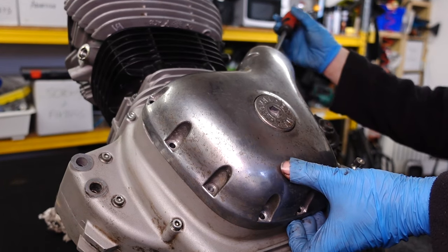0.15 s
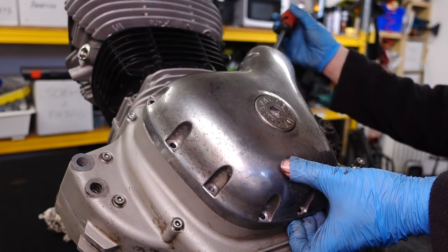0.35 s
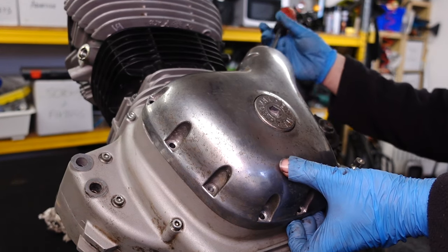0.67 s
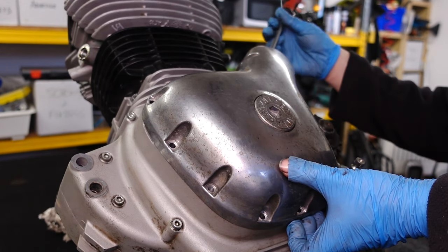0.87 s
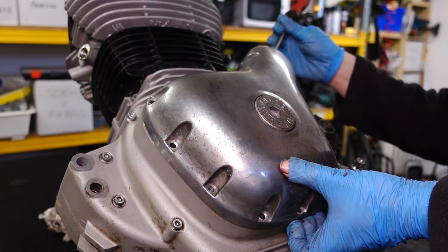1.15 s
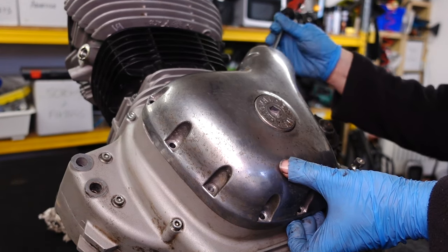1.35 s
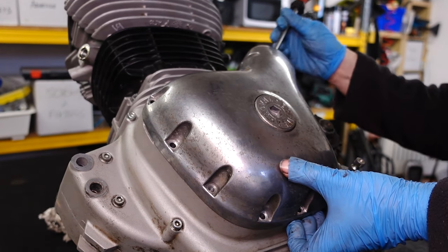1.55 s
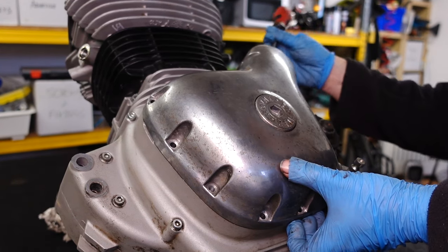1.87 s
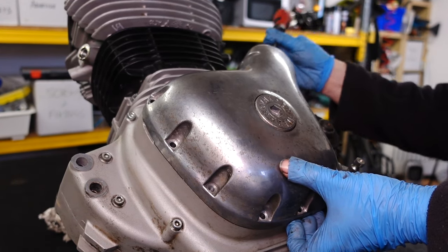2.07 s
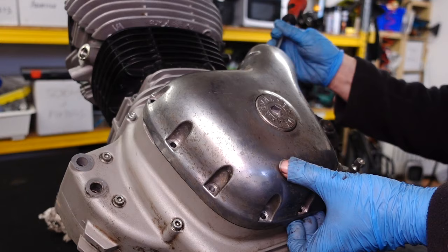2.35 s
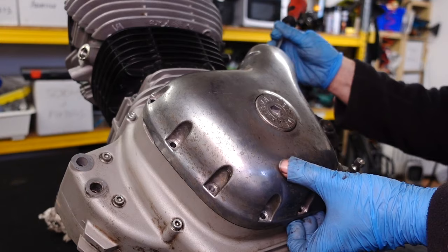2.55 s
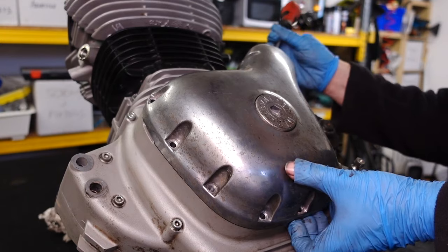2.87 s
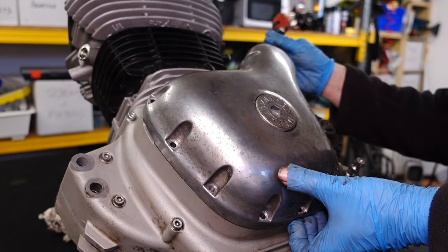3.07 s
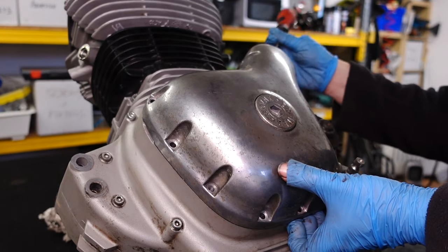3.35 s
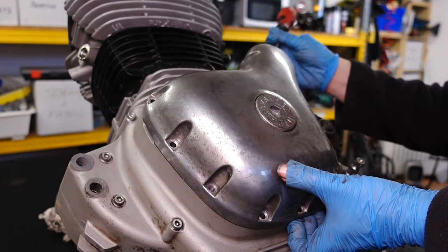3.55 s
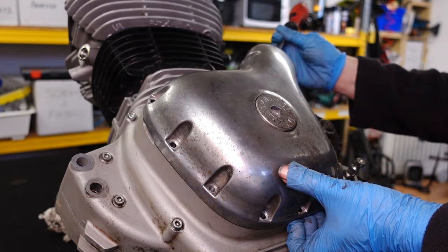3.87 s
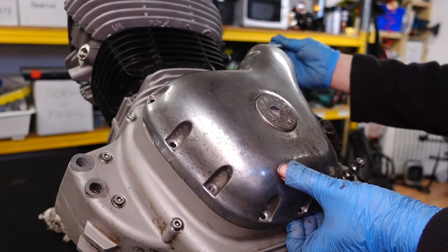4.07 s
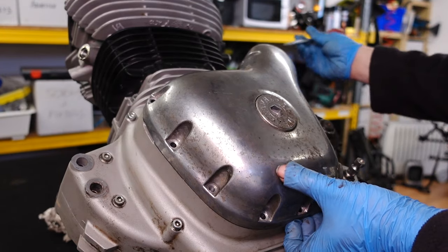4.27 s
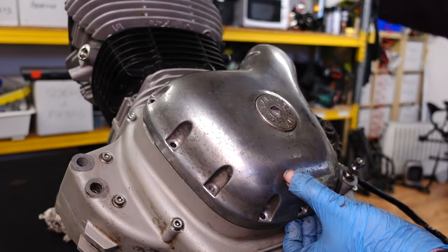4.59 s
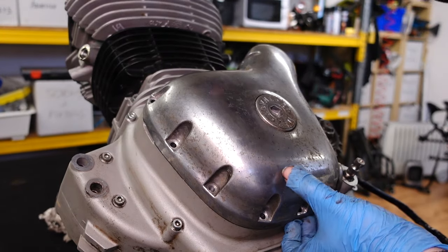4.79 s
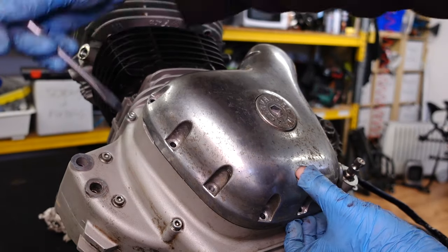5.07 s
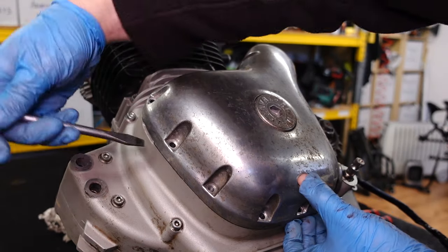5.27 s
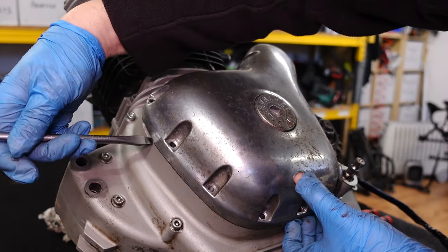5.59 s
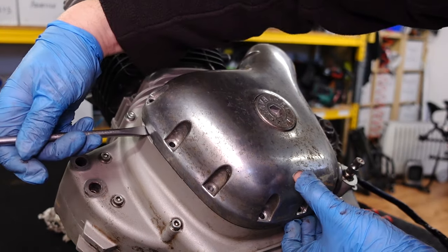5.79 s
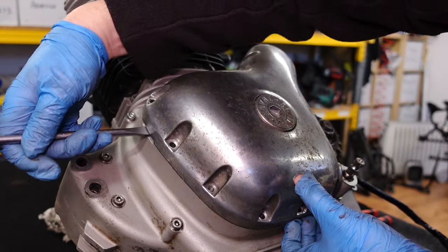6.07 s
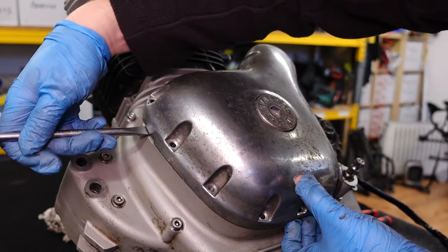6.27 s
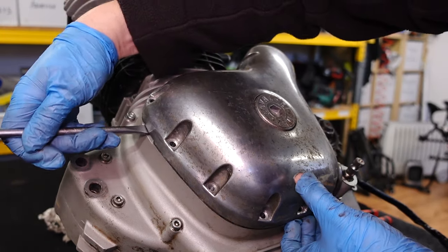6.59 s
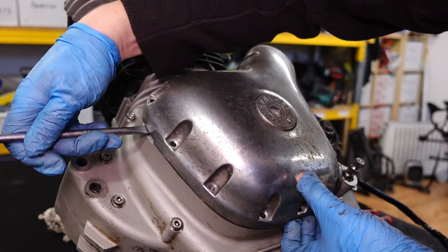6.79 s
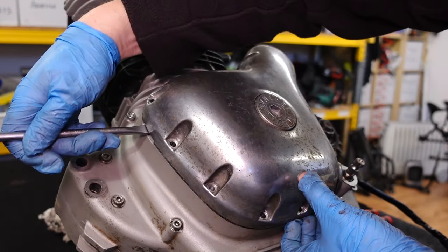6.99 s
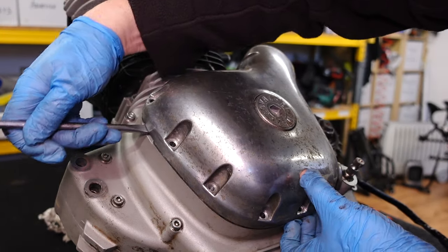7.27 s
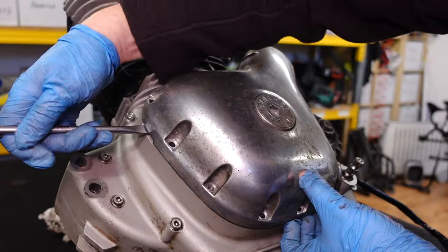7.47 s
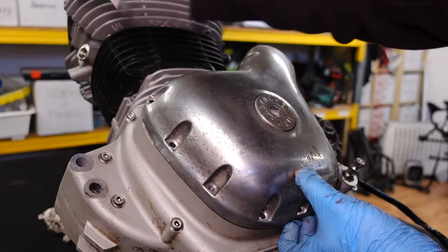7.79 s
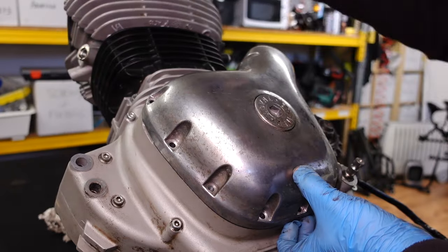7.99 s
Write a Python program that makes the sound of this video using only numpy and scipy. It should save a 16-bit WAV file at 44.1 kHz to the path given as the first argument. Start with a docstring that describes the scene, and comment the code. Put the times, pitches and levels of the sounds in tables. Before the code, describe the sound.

Light steel ticks and rubbery handling, a run of hollow metallic prying knocks, a pause, one hard click, then a sharp crack and loose dull knocks.

```python
"""On a workshop bench, a flat screwdriver taps and then pries at an engine's cast aluminium side cover.
Steel clicks are cracks of noise through blade resonances; the cover's knocks are damped modes; handle
bumps, then the rocking engine, thud as soft low pushes. Rubber, cloth and scrapes are noise in swells.
A rest with scattered clicks follows; then the seal cracks, the cover jumps, clatters and jolts the bench,
and is levered loose and settles. Small-room reflections follow each blow; quiet air lies underneath."""
import sys
import numpy as np
from scipy import signal
from scipy.fft import rfft, irfft, next_fast_len
from scipy.io import wavfile
from scipy.ndimage import map_coordinates

SR = 44100
rng = np.random.default_rng(int(sys.argv[2]) if len(sys.argv) > 2 else 0)


def unload_wav(signal):
    """Save mono or channel-first audio to the path in sys.argv[1] as 16-bit WAV at rate SR, clipped to [-1, 1]."""
    wavfile.write(
        sys.argv[1],
        SR,
        np.round(np.clip(np.atleast_2d(signal).T, -1, 1) * 32767).astype(np.int16),
    )


N = 358533
AGE = np.arange(SR // 2) / SR  # seconds since a contact
FIRST_10_MS, FIRST_20_MS, FIRST_31_MS = SR // 100, SR // 50, SR // 32  # stretches that set a level, samples

# Lever strokes in the joint: start_s, body_db, clank_db, clack_db, tick_db, blade_hz, return_scrape_db
PRY_STROKES = [(1.5098,-35,-43.5,-42.5,-55.5,1620,-65), (1.734,-40.5,-49,-53.5,-42,6100,-59),
               (1.9935,-39,-50,-59.5,-46.5,6100,-56), (2.192,-28.5,-42.5,-49,-43,6570,-60),
               (2.382,-28.5,-42.5,-49.5,-42,4630,-64.5), (2.578,-27.5,-45.5,-46.5,-47,4600,-62),
               (3.29,-26.5,-49.5,-44.5,-36,6130,-70), (3.511,-23,-53,-51.5,-48.5,4600,-96)]
# As the seal gives, the cover sounds higher and the bench gets less force: time_s, pitch_hz, thud_db
SEAL_GIVING = [(1.51,383,-41), (2.19,510,-38.5), (2.58,565,-41.5), (3.29,570,-53), (3.51,570,-55)]
FREE_HZ, RING_GROWTH = 558, 1.05  # pitch (Hz) of full ring time; power by which ring time follows pitch
# After a pry the tip drags back: share of the gap to the next stroke, longest delay (s), spread (s)
RETURN_SHARE, RETURN_MAX_S, RETURN_SPREAD_S = .45, 0.197, .013

# The seal cracks, then the cover jumps: start_s, body_db, clank_db, clack_db, tick_db, fizz_db, thud_db
SEAL_CRACKS = [(6.393,-35,-51.5,-50.5,-56.5,-65.5,-37.5), (6.4137,-14.5,-31,-38.5,-41,-43.5,-31.5)]
LOOSE_S = 6.416  # the cover jumps loose
BOUNCE_S, BOUNCE_LOSS_DB, FIRST_BOUNCE_DB = .018, 5.5, -36.5  # spacing, loss per bounce, first clank
# Bench modes under the jolt, before its taper: pitch_hz, level_db, t60_s
BENCH_MODES = [(31,-51,3), (47,-54.5,0.6), (177,-56,0.28), (192,-45,0.56), (215.4,-36,0.57), (264,-46,0.34)]

# The loose cover is levered out and falls back: start_s, body_db, fall_db
LOOSE_STROKES = [(6.709,-33,-53.5), (6.923,-32.5,-40), (7.1281,-27.5,-40.5), (7.3371,-27.5,-41)]
SLACK_S, FALL_S = .0095, .052  # slack is taken up this long before the knock; the fall comes after it

# The tip clicks on the metal as it lands, or at 4.06 s as it pulls out:
# start_s, body_db, clack_db, tick_db, blade_hz
TIP_CLICKS = [(0.1191,-59.5,-47,-41.5,4840), (0.266,-63,-57.5,-66,2970), (0.404,-51.5,-52.5,-54,2960),
              (0.4187,-48.5,-47,-49,1730), (0.869,-68,-58,-67,2250), (0.937,-47,-60,-63,4500),
              (1,-52.5,-52.5,-47,4230), (1.184,-59,-53.5,-53.5,5700), (2.798,-56,-58,-55,5750),
              (3.2863,-62,-54,-41,4700), (3.536,-70,-63,-54,4600), (4.06,-53,-40,-32.5,5070),
              (5.431,-19.5,-28.5,-29.5,3780), (5.831,-47,-58.5,-78,3800), (5.88,-62.5,-70,-62,5230),
              (5.974,-48.5,-68,-59,3550)]
CLICK_SPOT_HZ = 548
RING_DOUBLING_DB, FULL_RING_DB = 28.5, -20.5  # a harder contact rings longer, fully at this body level
PULL_OUT_S = 4.0605
# The blade rings on, clear of the joint: pitch_hz, level_db, t60_s
FREE_BLADE_MODES = [(1426,-44,0.12), (2140,-49,0.18), (2270,-56,.2), (5210,-61,.22), (5230,-57,0.33),
                    (7230,-48,0.12), (7200,-49,0.11)]

# The cover settles softly on its case: start_s, body_db, pitch_hz
COVER_SETTLES = [(1.223,-48.5,672), (1.603,-46,466), (1.8415,-45,540), (2.119,-52,580), (2.296,-50.5,560),
                 (3.429,-51.5,543), (3.708,-50,551), (6.538,-43,532), (7.565,-46,460)]
# Soft thuds: the handle bumps in the first second, later the engine rocks on the bench:
# start_s, level_db, pitch_hz
SOFT_THUDS = [(0.416,-53,213), (0.599,-57.5,326), (0.935,-57,217), (1.219,-46.5,132), (1.283,-55,103),
              (1.366,-51,101), (1.452,-54.5,121), (1.511,-35.5,161.4), (1.571,-34,114), (1.657,-42,144),
              (1.82,-40.5,112), (7.566,-51.5,129)]

# Bending modes of the whole cover, at ring length 1: pitch_hz, relative_db, t60_s
COVER_MODES = [(370,3,0.12), (473.1,3,0.14), (513,-8,0.14), (583.5,2.5,0.049), (594.8,-3.5,0.14),
               (685,-8,0.076), (755,-6,0.15)]
# Higher modes of the cover's wall, at ring length 1: pitch_hz, relative_db, t60_s
WALL_MODES = [(877,5.5,0.05), (977,-6.5,0.13), (1043,-3,0.075), (1259,2,0.052), (1334,3,0.079),
              (1470,-13,.14), (1500,-11,0.076), (1700,-11.5,0.023)]
# Modes of the steel blade: pitch_hz, relative_db, t60_s
BLADE_MODES = [(2280,-15.5,0.04), (3094,-3,0.057), (4340,9,0.021), (4880,3,0.042), (5660,-17.5,.05),
               (7130,-4,0.029), (8370,-13,0.037)]

# The tip drags along the joint: centre_s, spread_s, grit_db, body_db
TIP_SCRAPES = [(0.408,0.0072,-55,-55), (1.205,0.0098,-64,-55), (1.66,0.01,-57.5,-40.5),
               (2.735,0.055,-61,-54.5), (2.916,0.014,-65.5,-61.5), (3.108,0.088,-69,-66),
               (4.019,0.017,-57.5,-51.5), (4.35,0.054,-72,-62), (4.83,0.03,-66,-60.5),
               (5.977,0.012,-66,-43), (6.192,0.01,-78,-55), (6.415,0.0072,-41,-46.5),
               (7.54,0.013,-56,-49.5)]
# The rubber glove slides on the handle: centre_s, spread_s, level_db
GLOVE_SLIDES = [(.535,0.025,-53.5), (.605,0.024,-50), (.74,0.1,-62.5), (.96,0.038,-56), (4.53,0.018,-59.5),
                (6.31,0.024,-66.5)]
# The sleeve moves with the arm: centre_s, spread_s, level_db
SLEEVE_MOVES = [(3.88,0.16,-67.5), (4.2,0.12,-64.5), (4.75,0.18,-67), (5.3,0.53,-69), (8.08,0.17,-66)]

# Colour of gritty steel sliding: frequency_hz, relative_db
GRIT_COLOUR = [(1200,-35), (2000,-8), (2800,-5), (3500,-7), (4500,-1), (5400,-5), (6150,0.5), (6900,-9.5),
               (14000,-27.5)]
# Colour of rubber rubbing: frequency_hz, relative_db
RUBBER_COLOUR = [(1000,-29.5), (2000,-6.5), (2800,2.5), (4000,-1), (6000,3.5), (9700,-1), (16000,-15)]
# Colour of cloth rubbing: frequency_hz, relative_db
CLOTH_COLOUR = [(400,-27), (900,0.5), (1800,-0.5), (3600,-1), (6500,-4), (10000,-11), (16000,-22.5)]

# Decay of the small room: frequency_hz, t60_s
ROOM_DECAY = [(100, 0.32), (500, 0.27), (1300, 0.37), (5000, 0.28), (14000, 0.06)]
# Colour of the room's reflections: frequency_hz, relative_db
REFLECTION_COLOUR = [(80,6), (200,8.5), (500,-1.5), (750,-3), (1100,-8.5), (1800,-9), (3500,-8.5),
                     (6000,-11), (14000,-0.5)]
# Colour of the workshop's air: frequency_hz, relative_db
AIR_COLOUR = [(12,-19.5), (22,3.5), (60,-4.5), (107,3.5), (146,-6.5), (190,-4.5), (350,-8), (590,-12),
              (1000,-19.5), (2200,-24), (6000,-22), (15000,-30)]
AIR_DB = -62.5
TOP_HZ = 16000  # top of the camera's band


def pries(fizz_db=-18, overtone_db=-7, lead_s=0.00712, lead_db=-16, lead_clank_db=-16):
    """Each lever stroke takes up slack, snaps the tip, knocks the cover and shoves the engine on the bench."""
    out = np.zeros(N)
    seal_s, seal_hz, seal_db = np.transpose(SEAL_GIVING)
    for s, body_db, clank_db, clack_db, tick_db, blade_hz, _ in PRY_STROKES:
        spot_hz = np.interp(s, seal_s, seal_hz)
        thud_db = np.interp(s, seal_s, seal_db)
        slack = knock(body_db + lead_db, clank_db + lead_clank_db, spot_hz=643, length=1.0, hard_rise_s=0.008)
        add(out, s - lead_s, slack)
        add(out, s, knock(body_db, clank_db, spot_hz, length=(spot_hz / FREE_HZ) ** RING_GROWTH))
        add(out, s, click(clack_db, tick_db, tick_db + fizz_db, blade_hz, blade_db=9.5))
        add(out, s, thud(thud_db, hz=116.4) + thud(thud_db + overtone_db, hz=204))
    return out


def breakaway(overtone_db=-2):
    """The seal lets go in two quick cracks that shake the engine."""
    out = np.zeros(N)
    for s, body_db, clank_db, clack_db, tick_db, fizz_db, thud_db in SEAL_CRACKS:
        add(out, s, knock(body_db, clank_db, spot_hz=506, length=0.63))
        add(out, s, click(clack_db, tick_db, fizz_db, blade_hz=2700, blade_db=9.5))
        add(out, s, thud(thud_db, hz=131) + thud(thud_db + overtone_db, hz=215))
    return out


def clatter(body_db=-4, count=4):
    """After the jump the cover bounces on its rim, each time more weakly."""
    out = np.zeros(N)
    for k in range(count):
        clank_db = FIRST_BOUNCE_DB - k * BOUNCE_LOSS_DB
        bounce = knock(clank_db + body_db, clank_db, spot_hz=710, length=1.6, hard_rise_s=.012)
        add(out, LOOSE_S + (k + .5) * BOUNCE_S, bounce)
    return out


def jolt():
    """When the cover jumps loose, the whole bench shudders in its damped modes."""
    out = np.zeros(N)
    taper = (1 - AGE / AGE[-1]) ** .5  # silent after half a second
    add(out, LOOSE_S, ring(BENCH_MODES, 1, scatter_db=3.0) * swell(.008) * taper)
    return out


def wiggles(lead_db=-9, lead_clank_db=-26, ring_db=-7, fall_clank_db=-24):
    """The loose cover takes up its slack, knocks against the blade and drops back."""
    out = np.zeros(N)
    for s, db, fall_db in LOOSE_STROKES:
        add(out, s - SLACK_S, knock(db + lead_db, db + lead_clank_db, spot_hz=513, length=0.83))
        add(out, s, nudge(db) + knock(db + ring_db, clank_db=-50, spot_hz=450.5, length=1.0))
        add(out, s, click(clack_db=-52.5, tick_db=-56, fizz_db=-70.5, blade_hz=1730, blade_db=-12))
        add(out, s, thud(db=-47, hz=135))
        add(out, s + FALL_S, knock(fall_db, fall_db + fall_clank_db, spot_hz=452, length=1.03))
    return out


def tip_clicks(clank_db=-7, fizz_db=-19):
    """The tip clicks on the metal and the cover answers; pulled clear, the blade rings freely."""
    out = np.zeros(N)
    for s, body_db, clack_db, tick_db, blade_hz in TIP_CLICKS:
        length = 2 ** ((body_db - FULL_RING_DB) / RING_DOUBLING_DB)
        add(out, s, knock(body_db, (body_db + clack_db) / 2 + clank_db, CLICK_SPOT_HZ, length))
        add(out, s, click(clack_db, tick_db, tick_db + fizz_db, blade_hz, blade_db=17))
    add(out, PULL_OUT_S, ring(FREE_BLADE_MODES, 1, scatter_db=1.5))
    return out


def settling(clank_db=-14):
    """The cover sinks back on its case with soft knocks; the handle bumps, later the engine rocks: soft thuds."""
    out = np.zeros(N)
    for s, db, spot_hz in COVER_SETTLES:
        add(out, s, knock(db, db + clank_db, spot_hz, length=0.91))
    for s, db, hz in SOFT_THUDS:
        add(out, s, thud(db, hz))
    return out


def knock(db, clank_db, spot_hz, length, hard_rise_s=0.00084, octaves=0.16, rattle_db=-3, chatter_db=-7):
    """The cover's low modes ring as the spot and the hand allow; its wall adds a short clank."""
    favour = lambda hz: 1 / (1 + (np.log2(hz / spot_hz) / octaves) ** 2)
    rise = min(hard_rise_s * amp(db - clank_db - 13.5), .008)  # a blow with little clank is a slow push
    modes = ring(COVER_MODES, length, scatter_db=4.5, weight=favour) * swell(rise)
    body = unit(band(modes, spot_hz * 0.65, spot_hz * 1.187), FIRST_20_MS)
    rattle = unit(band(burst(0.028) * swell(rise), spot_hz * 0.61, 860), FIRST_20_MS)
    wall = unit(ring(WALL_MODES, length ** .5, scatter_db=5.0) * swell(rise / 2), FIRST_20_MS)
    chatter = unit(band(burst(0.021) * swell(rise / 2), 850, 1500), FIRST_20_MS)
    clank = unit(wall + amp(chatter_db) * chatter, FIRST_20_MS)
    low = in_room(amp(db) * body, wet_db=-21.0)
    return low + in_room(amp(clank_db) * (clank + amp(rattle_db) * rattle), wet_db=-8.5)


def click(clack_db, tick_db, fizz_db, blade_hz, blade_db, crack_t60=0.022, snap_db=8, ring_db=-11,
          sharpness=9, casting_db=-4, rim_hz=1750, rim_db=6):
    """Steel cracks on aluminium: noise coloured by a blade resonance and the cover's rim, plus a faint ring."""
    crack = unit(burst(crack_t60) + amp(snap_db) * burst(0.0018), FIRST_10_MS)
    resonance = lambda hz: signal.lfilter(*signal.iirpeak(hz, sharpness, fs=SR), crack)
    blade_ring = unit(ring(BLADE_MODES, 1, scatter_db=1.5), FIRST_10_MS)
    steel = crack + amp(blade_db) * resonance(blade_hz) + amp(ring_db) * blade_ring
    rim = amp(rim_db) * resonance(rim_hz)
    clack = amp(clack_db) * unit(band(steel + rim, 1200, 2960, order=4), FIRST_10_MS)
    tick = amp(tick_db) * unit(band(steel, 3100, 7600, order=4), FIRST_10_MS)
    fizz = amp(fizz_db) * unit(band(crack, 7800, 14000, order=2), FIRST_10_MS)
    # A dull tock stands for the part of the crack that passes into the casting.
    tock = amp(clack_db + casting_db) * unit(band(burst(0.027), 620, 1250, order=2), FIRST_10_MS)
    return in_room(tick + fizz, wet_db=-11.5) + in_room(clack + tock, wet_db=-7.5)


def thud(db, hz, push_s=0.0062):
    """A soft low push that swells and dies in a few cycles, with a brief boom as of bench boards."""
    u = AGE / push_s * hz / 120  # a low push also swells and dies more slowly
    push = unit(np.sin(2 * np.pi * hz * AGE) * u ** 2 * np.exp(-u), FIRST_31_MS)
    boards = amp(-10) * unit(band(burst(.18) * swell(.006), 75, 280), FIRST_31_MS)
    return in_room(amp(db) * unit(push + boards, FIRST_31_MS), wet_db=-17)


def nudge(db, hz=535, push_s=0.0019):
    """The blade bears on the cover and damps it at once: a knock of only a few cycles."""
    u = AGE / push_s
    envelope = (u * u * np.exp(-u / 2)) ** 2
    cycles = unit(np.sin(2 * np.pi * hz * AGE) * envelope, FIRST_20_MS)
    return in_room(amp(db) * cycles, wet_db=-21.5)


def scrapes(wall_db=-8):
    """The dragged tip hisses and sets the cover's wall and body singing."""
    strokes = list(TIP_SCRAPES) + return_strokes()
    grit, body = level(strokes, 2), level(strokes, 3)
    wall = amp(wall_db) * np.sqrt(grit * body)
    rasp = grainy(hiss(GRIT_COLOUR), rate=400, depth=3)
    return grit * rasp + wall * rubbed(WALL_MODES) + body * rubbed(COVER_MODES)


def return_strokes(body_db=7):
    """After each pry the tip drags back; rows as in TIP_SCRAPES."""
    gaps = np.diff([row[0] for row in PRY_STROKES], append=N / SR)
    rows = []
    for (s, *_, grit_db), gap in zip(PRY_STROKES, gaps):
        delay = min(RETURN_SHARE * gap, RETURN_MAX_S)
        rows.append((s + delay, RETURN_SPREAD_S, grit_db, grit_db + body_db))
    return rows


def rustle():
    """Rubber on the handle and cloth on the arm rub in smooth swishes of noise."""
    glove = level(GLOVE_SLIDES, 2) * grainy(hiss(RUBBER_COLOUR), rate=200, depth=.7)
    sleeve = level(SLEEVE_MOVES, 2) * grainy(hiss(CLOTH_COLOUR), rate=40, depth=1)
    return glove + sleeve


def in_room(x, wet_db, gap_s=0.00067):
    """A contact, direct, plus its own fainter tail of reflections from shelves and walls."""
    hz, t, z = signal.stft(rng.standard_normal(len(AGE)), SR, nperseg=256)
    z = z * np.exp(-np.log(1000) * t / along(ROOM_DECAY, hz)[:, None])
    z = z * amp(along(REFLECTION_COLOUR, hz))[:, None]
    tail = signal.istft(z, SR, nperseg=256)[1][:len(AGE)] * swell(gap_s)
    reflections = signal.fftconvolve(x, tail / np.linalg.norm(tail))[:len(x)]
    return x + amp(wet_db) * reflections


def workshop_air():
    """The quiet air of the workshop: steady noise, strongest in the lows."""
    return amp(AIR_DB) * hiss(AIR_COLOUR)


def ring(modes, length, scatter_db, weight=lambda hz: 1):
    """Damped modes, struck at new strengths each time."""
    out = np.zeros(len(AGE))
    for hz, db, t60 in modes:
        strength = weight(hz) * amp(db + scatter_db * rng.standard_normal())
        out += strength * np.sin(2 * np.pi * hz * AGE) * fade(t60 * length)
    return out


def burst(t60):
    """A dying puff of noise."""
    return rng.standard_normal(len(AGE)) * fade(t60)


def fade(t60):
    """Exponential decay after a contact, 60 dB in t60 seconds."""
    return np.exp(-np.log(1000) * AGE / max(t60, 1e-4))


def swell(seconds):
    """Soft exponential onset of a contact."""
    return 1 - np.exp(-AGE / max(seconds, 1e-5))


def rubbed(modes):
    """Noise of rms 1 that sings in the given modes, each a resonance as wide as its damping."""
    def gain(hz):
        return np.sqrt(sum(amp(2 * db) / (1 + ((hz - f) * t60) ** 2) for f, db, t60 in modes))
    return unit(filtered(rng.standard_normal(N), gain))


def grainy(noise, rate, depth):
    """Sliding contact grips unevenly: a random level flutter, depth in dB, rate in knots a second."""
    return unit(noise * amp(np.clip(depth, 0, 4) * wobble(rate)))


def wobble(rate):
    """A smooth random curve, rate knots a second."""
    knots = rng.standard_normal(int(N * rate / SR) + 4)
    return map_coordinates(knots, [np.arange(N) * rate / SR])


def hiss(spectrum):
    """Coloured noise of rms 1."""
    return unit(filtered(rng.standard_normal(N), lambda hz: amp(along(spectrum, hz))))


def level(strokes, db_column):
    """Gain per sample of strokes that swell and die away; their powers add."""
    t = np.arange(0, N, 64)
    power = np.zeros(len(t))
    for row in strokes:
        u = np.clip((t / SR - row[0]) / row[1], -30, 30)
        power += (amp(row[db_column]) / np.cosh(u)) ** 2
    return np.interp(np.arange(N), t, np.sqrt(power))


def filtered(x, gain):
    """x times a gain that depends on frequency."""
    m = next_fast_len(N + SR // 2)
    return irfft(rfft(x, m) * gain(np.fft.rfftfreq(m, 1 / SR)), m)[:N]


def band(x, lo_hz, hi_hz, order=3):
    """Causal band-pass."""
    edges = np.clip([lo_hz, max(hi_hz, lo_hz + 10)], 10, SR / 2 - 10)
    return signal.sosfilt(signal.butter(order, edges, 'band', fs=SR, output='sos'), x)


def along(points, hz):
    """Read (Hz, value) points on a log axis."""
    f, v = np.transpose(points)
    return np.interp(np.log(hz + 1), np.log(f + 1), v)


def amp(db):
    """Decibels to gain."""
    return 10 ** (np.asarray(db) / 20)


def unit(x, size=None):
    """Scale so that the first size samples (or all) have rms 1."""
    return x / np.sqrt(np.mean(x[:size] ** 2) + 1e-20)


def add(track, s, x):
    """Mix x into the track at time s."""
    part = track[max(round(s * SR), 0):][:len(x)]
    part += x[:len(part)]


def scene():
    """All contacts and rubbing over the quiet air of the workshop."""
    contacts = tip_clicks() + pries() + breakaway() + clatter() + jolt() + wiggles() + settling()
    return (contacts + scrapes() + rustle() + workshop_air())[None]


def record(dry):
    """The camera keeps only what lies below its band limit, on one channel."""
    return filtered(dry[0], lambda hz: hz < TOP_HZ)[None]


dry = scene()
out = record(dry)
unload_wav(out)
```